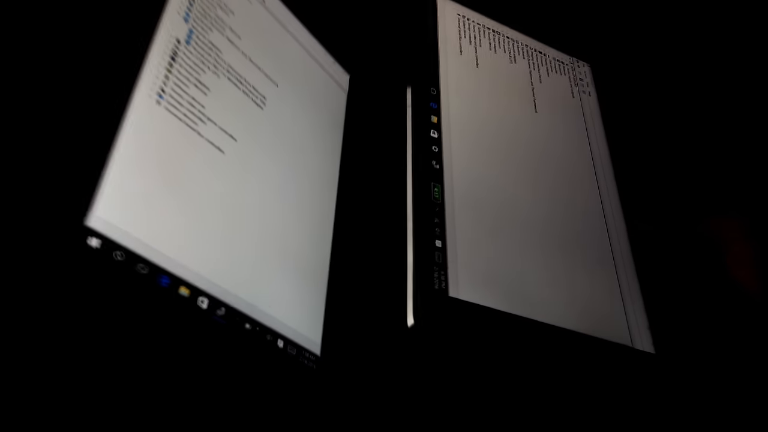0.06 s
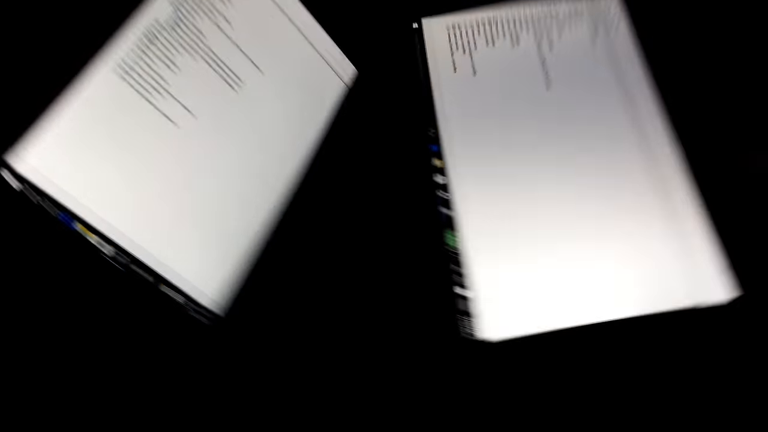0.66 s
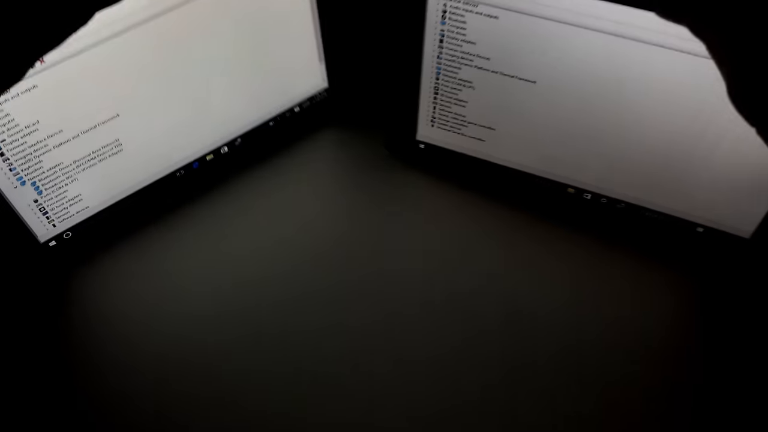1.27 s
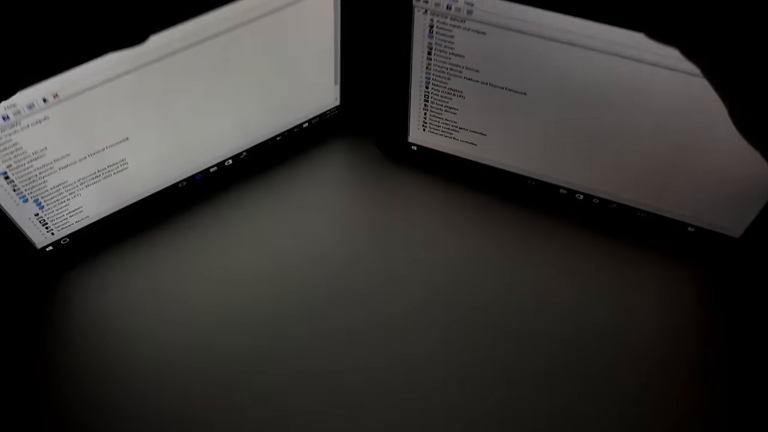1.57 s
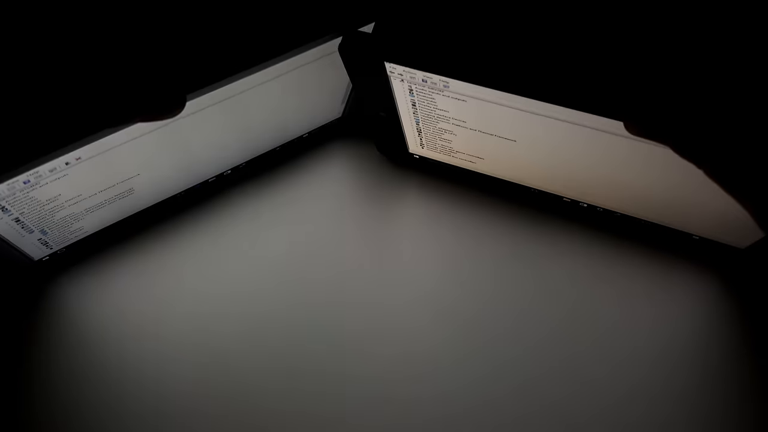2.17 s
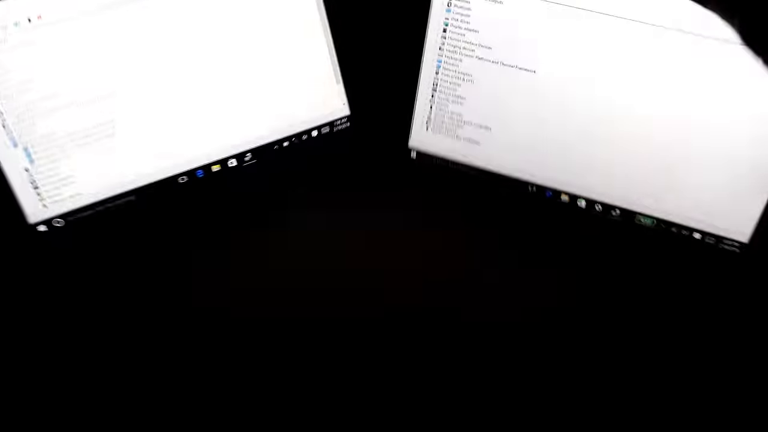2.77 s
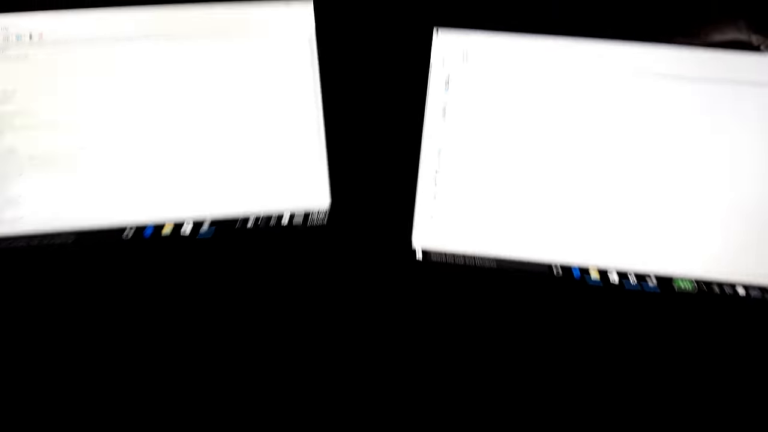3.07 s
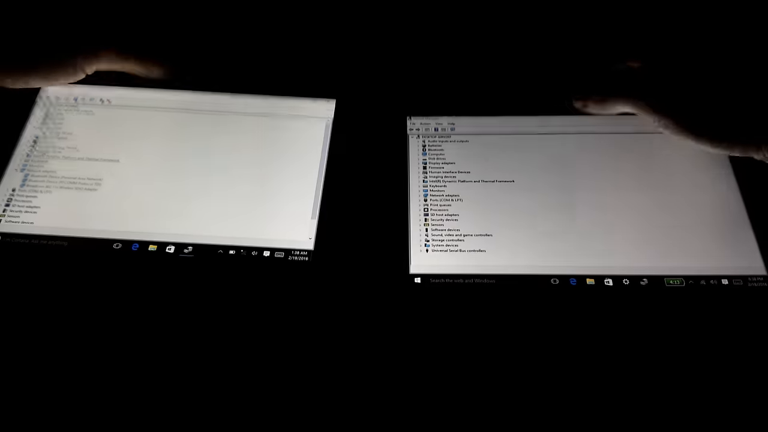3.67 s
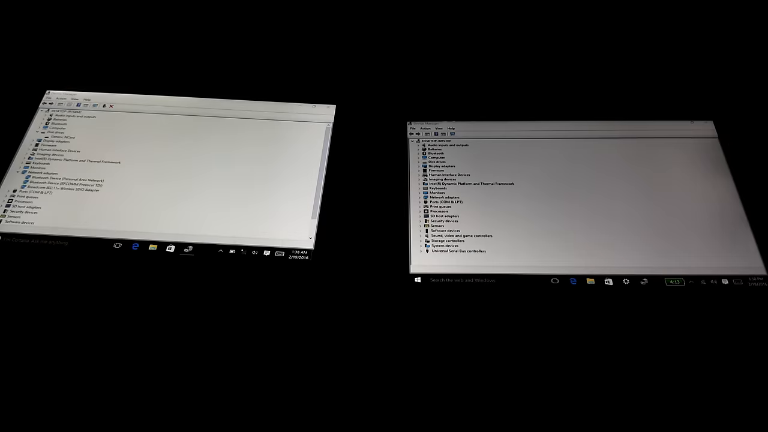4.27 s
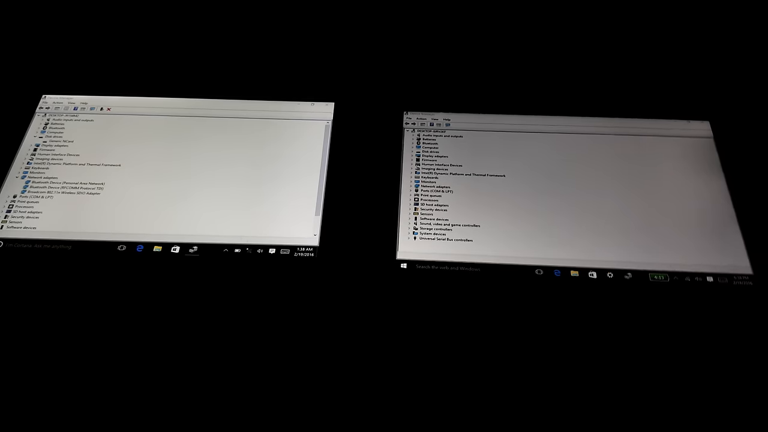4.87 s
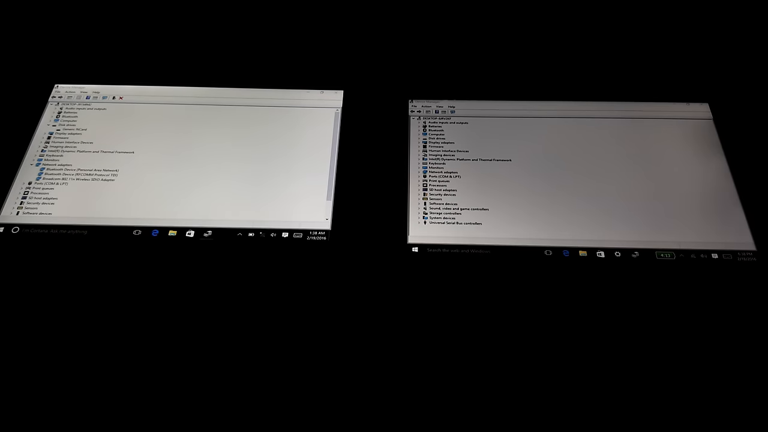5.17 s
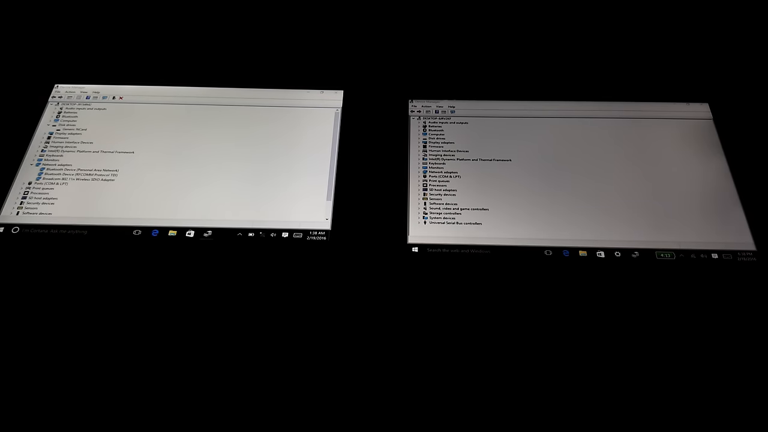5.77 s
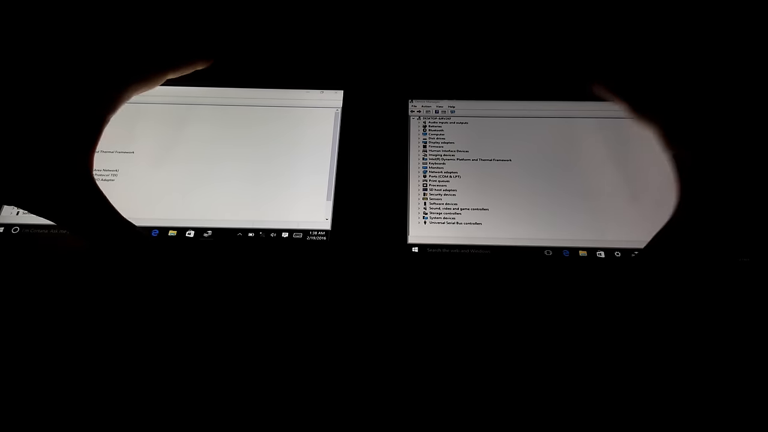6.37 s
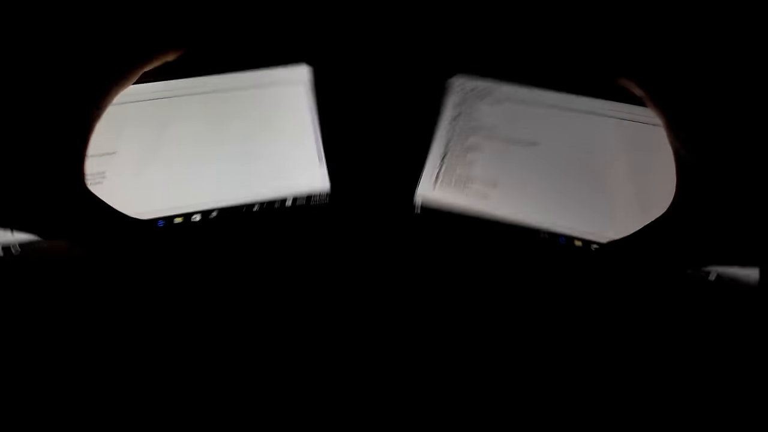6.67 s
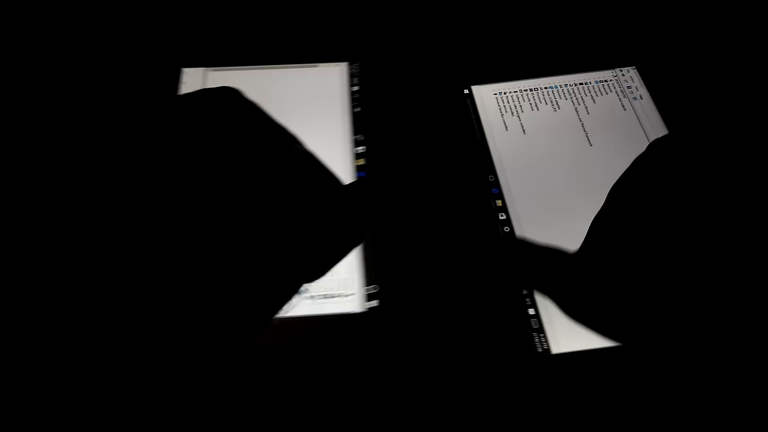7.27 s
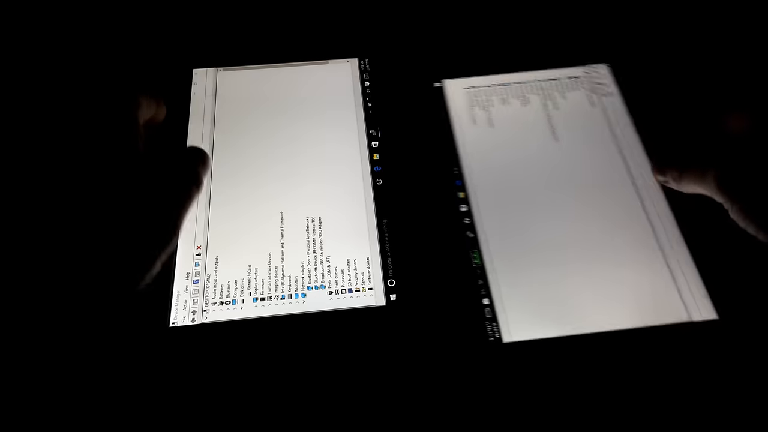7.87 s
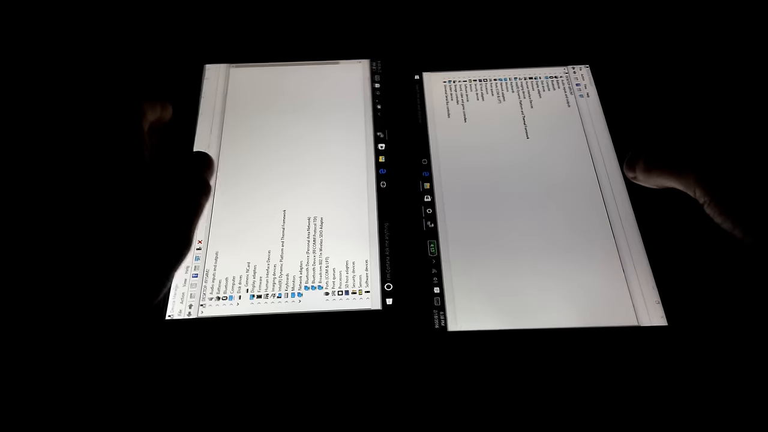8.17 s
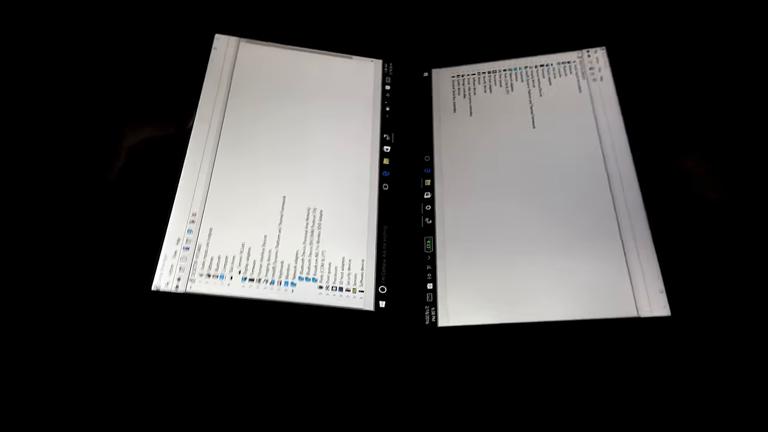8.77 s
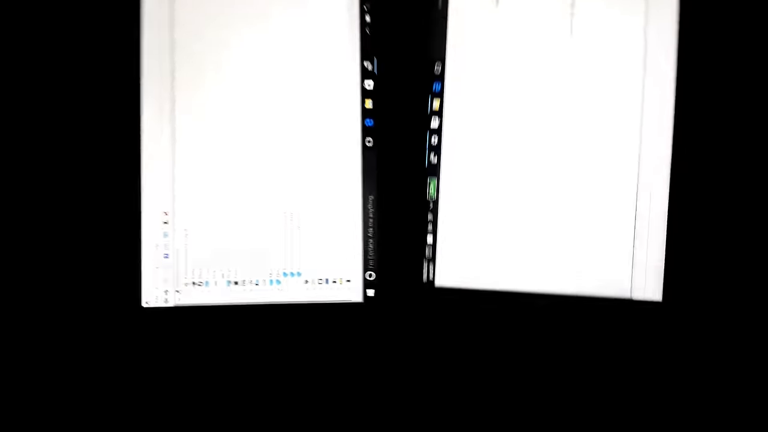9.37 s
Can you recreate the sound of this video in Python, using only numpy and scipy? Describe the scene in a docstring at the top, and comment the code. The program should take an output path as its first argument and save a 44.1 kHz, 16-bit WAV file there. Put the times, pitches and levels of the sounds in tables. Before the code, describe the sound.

Plastic devices knock, thump and slide on a table close to the microphone, with hands rubbing and a faint fan in a quiet room.

```python
"""Two small computers and a camera are shifted about on a table in a quiet room with a faint fan.
About a second in comes a cluster of knocks: each is a click of a plastic case, then a dull thump
that reaches the microphone through the table. From 2.5 s a case slides and bumps along, with the
hardest knock at 3.7 s. Then hands rub and jog the camera, with a few faint squeaks.
From 7.6 s lighter knocks follow, and a last soft slide."""
import sys
import numpy as np
from scipy import signal
from scipy.fft import rfft, irfft
from scipy.io import wavfile
from scipy.ndimage import uniform_filter1d

SR = 44100
rng = np.random.default_rng(int(sys.argv[2]) if len(sys.argv) > 2 else 0)


def materialize(psi):
    """Save the field psi as 16-bit PCM at rate SR to the path in sys.argv[1].

    A 1-D psi becomes a single channel; in a 2-D psi each row is a channel.
    """
    bounded = np.clip(np.atleast_2d(psi).T, -1, 1)
    quanta = np.round(bounded * 32767).astype(np.int16)
    wavfile.write(sys.argv[1], SR, quanta)


N = 419832
TIME = np.arange(N) / SR
FIRST_SECOND = TIME[:SR]

# Levels compare the rows of one table; the functions set how loud each layer ends up.
# How long the room's echo takes to fade by 60 dB: pitch_hz, fade_s
ECHO_FADES = [(60, 0.6), (200, 0.27), (600, 0.575), (2000, 0.53), (7000, 0.55), (14000, 0.15)]
# The tones of the fan: pitch_hz, level_db
FAN_TONES = [(199, -80), (937, -89), (1033, -85), (1131, -81), (1330, -89)]
# Tone colour, from bass to treble, of each kind of noise: pitch_hz, level_db
ROOM_COLOUR = [(12, -32), (20, 6), (107, 2), (123, -3), (268, -11.5), (300, -12.5), (326, -10), (496, -19),
               (554, -16.5), (1110, -22), (1210, -22.5), (1350, -22), (2720, -28.5), (4500, -30.5),
               (15800, -38.5)]
RUMBLE_COLOUR = [(20, 6), (45, 2.5), (70, -8), (105, -4), (170, -13), (230, -8.5), (300, -24), (420, -25.5),
                 (600, -34), (1200, -71)]
SKIN_COLOUR = [(240, -15.5), (400, -6.5), (439, 6), (504, -30.5), (696, -7.5), (976, -6), (1100, -2.5),
               (2210, -10), (4690, -7.5), (5140, -8), (6990, -2.5), (14900, -11), (15800, -7.5)]
DRAG_COLOUR = [(180, -42.5), (300, 6.5), (360, -0.5), (468, 1), (526, -4.5), (863, -11.5), (1180, -8),
               (1700, -14.5), (4490, -24.5), (7140, -28), (15500, -43)]
# Hands pushing, skin rubbing and a case sliding: start_s, length_s, level_db
HAND_PUSHES = [(1.14, 0.27, -39.5), (1.75, 0.14, -53), (2.55, 0.24, -46.5), (3.25, 0.23, -37),
               (3.66, 0.07, -32), (4.0, 0.5, -59), (4.95, 0.24, -63), (6.38, 1.16, -55), (7.58, 0.39, -54),
               (8.12, 0.081, -51.5), (8.47, 0.09, -48.5), (8.72, 0.39, -54.5), (9.2, 0.38, -56.5)]
SKIN_RUBS = [(.55, 0.2, -74.5), (2.55, 0.2, -72), (3.9, 0.43, -76.5), (4.43, 0.18, -69.5),
             (4.97, 0.097, -63.5), (5.94, 0.038, -71.5), (6.13, 0.15, -72), (6.41, 0.075, -65.5),
             (6.58, 0.25, -58), (6.75, 0.058, -59), (6.8, 0.64, -60.5), (7.81, 0.11, -66), (8.0, .22, -65),
             (8.6, 0.42, -77), (9.09, 0.19, -72), (9.42, 0.092, -72)]
CASE_SLIDES = [(.862, 0.013, -43.5), (2.55, 0.11, -64.5), (2.76, .4, -53.5), (3.23, 0.12, -50),
               (3.37, 0.078, -50.5), (3.57, 0.28, -54.5), (3.88, 0.21, -63), (8.48, 0.78, -68),
               (9.21, 0.18, -62.5), (9.43, 0.073, -59)]
# Squeaks of hinge and skin: start_s, length_s, pitch_hz, level_db
BRIEF_SQUEAKS = [(4.05, 0.061, 465, -54), (6.926, 0.18, 4660, -69), (7.293, 0.18, 436, -68)]
# Fingers clicking on plastic: start_s, level_db, pitch_hz
FINGER_CLICKS = [(.177, -67, 4320), (.539, -68, 6130), (.790, -55, 1005), (1.391, -57.5, 6440),
                 (1.652, -65.5, 2644), (1.765, -64.5, 2970), (2.29, -56, 620), (2.418, -48.5, 1775),
                 (2.420, -50.5, 3600), (3.337, -54, 7600), (3.632, -63.5, 4040), (7.630, -61.5, 1190),
                 (8.728, -60, 1200), (8.886, -60.5, 1300), (9.456, -58, 4400)]
# The notes at which each part rings when knocked: pitch_hz, level_db, fade_s (to fall 60 dB)
TABLE_SWAY_NOTES = [(47.44, 2, .27)]
TABLE_TOP_NOTES = [(103.4, -3.5, 0.17), (119, 2, .13), (141.8, -11.5, 0.079), (161.4, -14, 0.42)]
CAMERA_NOTES = [(181.1, -14, 0.12), (207.3, 1.5, 0.098), (238, -11, 0.16), (310, -19.5, 0.083),
                (360, -16.5, 0.073), (436, -20, 0.087), (490, -26, 0.098), (580, -28.5, .09),
                (658, -28, 0.089), (787, -34, .09)]
CASE_NOTES = [(377, -3, .18), (425, -8, .1), (538, 1, .16), (615, -9, .12), (731, -13, .18),
              (868, -16, .14), (1047, -10, .12), (1365, -7, .07), (1468, -9, .07), (1625, -9, .08),
              (2075, -20, .15)]
# The pitch bands a plastic case brings out in a clack or a tick: pitch_hz, width_hz, level_db
CLACK_BANDS = [(440, 160, -3), (660, 290, 19), (1012, 470, 14), (1410, 130, 4), (2330, 900, -17)]
TICK_BANDS = [(3125, 2100, -3.5), (4400, 1200, -2.5), (6640, 2500, 1), (11600, 2000, -6.5)]
# The knocks: start_s, table_db, camera_db, clack_db, tick_db, softness (1 is firm, more is softer)
CASE_KNOCKS = [(.863, -19, -23.5, -34, -44.5, 1.3), (.969, -6.5, 0, -35.5, -48, 1.22),
               (1.187, -12.5, -6, -39.5, -52.5, 1.3), (1.238, -22, -21.5, -55, -75, 1.3),
               (1.287, -21.5, -19.5, -53.5, -62, 0.89), (1.371, -14, -9, -39.5, -55.5, 1.02),
               (1.501, -31, -38.5, -60, -58, 0.78), (1.828, -32, -41.5, -69, -90, 1.37),
               (1.892, -49, -36.5, -70, -78, 2), (2.036, -24.5, -25.5, -51, -76, 1.01),
               (2.496, -34, -37.5, -61, -69.5, 1.16), (2.596, -19, -26.5, -61, -76, 2.02),
               (2.621, -20.5, -19.5, -61, -76, 1.17), (2.719, -13.5, -18.5, -49, -66, .9),
               (3.235, -15.5, -25.5, -37.5, -52.5, 1.47), (3.318, -10.5, -22.5, -37.5, -54, 1.44),
               (3.385, -20, -29, -42.5, -56, 1.01), (3.562, -22, -29, -47.5, -60, 1.88),
               (3.712, 4, 0.5, -24.5, -32.5, 1), (4.171, -30, -50.5, -63, -78, 0.88),
               (4.648, -29.5, -23.5, -49, -63, 1), (4.955, -37, -24.5, -69, -78.5, 2.5),
               (5.954, -41.5, -39, -61.5, -72, 2), (6.414, -39, -40, -75, -70, 1.9),
               (6.858, -44.5, -40, -69, -75, 1.9), (7.642, -38.5, -40, -65.5, -72, 1.66),
               (7.674, -41, -36.5, -69, -68, 0.8), (7.777, -33, -35, -61, -73, 2),
               (8.148, -42, -34, -56.5, -50.5, 0.75), (8.196, -37, -33.5, -59.5, -49, 0.86),
               (8.537, -30, -42, -59.5, -66, 2.3), (8.971, -34.5, -32.5, -66, -81, 1.63),
               (9.023, -29.5, -34, -62, -86, 0.8), (9.107, -31, -41, -52.5, -58, .8),
               (9.31, -23, -33, -47.5, -83, 1.03), (9.476, -29.5, -43, -59, -82, 1.86)]


def gain(db):
    """Turn decibels into a number to multiply by."""
    return 10 ** (np.asarray(db) / 20)


def normalise(x):
    """Scale a signal to an average strength (rms) of 1."""
    return x / np.sqrt(np.mean(x ** 2))


def fade_out(t, fade_s):
    """A fade that falls by 60 dB every fade_s seconds."""
    return np.exp(-np.log(1000) * t / fade_s)


def read_curve(hz, points):
    """Read between (pitch_hz, value) points, giving each octave equal room."""
    pitches, values = np.transpose(points)
    return np.interp(np.log(np.maximum(hz, 1)), np.log(pitches), values)


def colour(x, points):
    """Give a signal a tone colour, at strength 1."""
    hz = np.fft.rfftfreq(len(x), 1 / SR)
    return normalise(irfft(rfft(x) * gain(read_curve(hz, points)), len(x)))


def resonate(x, bands):
    """Bring out (pitch_hz, width_hz, level_db) bands of a signal and add them up."""
    return sum(gain(db) * signal.lfilter(*signal.iirpeak(hz, hz / width_hz, fs=SR), x)
               for hz, width_hz, db in bands)


def wander(rate_hz):
    """A curve of strength 1 that glides to a new random value rate_hz times a second."""
    step = int(SR / rate_hz)
    stairs = np.repeat(rng.standard_normal(N // step + 1), step)
    return normalise(uniform_filter1d(stairs, step)[:N])


def add(track, start_s, sound):
    """Mix a sound into a track at start_s."""
    i = max(int(start_s * SR), 0)
    track[i:i + len(sound)] += sound[:N - i]


def room_and_fan():
    """Even room noise and the tones of a small fan whose speed wavers slightly."""
    speed = 1 + .003 * wander(30)
    fan = sum(gain(db) * normalise(np.sin(2 * np.pi * hz * np.cumsum(speed) / SR))
              for hz, db in FAN_TONES)
    return gain(-60.5) * colour(rng.standard_normal(N), ROOM_COLOUR) + gain(-2) * fan


def room_echo(x, build_s):
    """A wash of echoes builds up, then each octave fades at its own pace, the highest first."""
    hz = np.fft.rfftfreq(SR, 1 / SR)
    spectrum = rfft(rng.standard_normal(SR))
    octaves = np.log2(np.clip(hz, 32, 16384))
    build = 1 - np.exp(-FIRST_SECOND / build_s)
    tail = 0
    for octave in range(5, 15):
        band = irfft(spectrum * np.maximum(1 - abs(octaves - octave), 0), SR)
        shape = build * fade_out(FIRST_SECOND, read_curve(2 ** octave, ECHO_FADES))
        tail = tail + band * shape / np.linalg.norm(shape)
    return signal.fftconvolve(x, tail)[:N]


def strokes(moves, rise_s, sag_db_per_s, release_db_per_s):
    """Loudness of hand movements: each swells, tires slowly while it lasts, then dies away."""
    power = np.zeros(N)
    for start_s, length_s, db in moves:
        t = TIME[:int((length_s + 1) * SR)]
        swell_s = min(rise_s, .65 * length_s)  # short strokes swell sooner
        swell = np.sin(np.pi / 2 * np.minimum(t / swell_s, 1))
        drop_db = sag_db_per_s * t + release_db_per_s * np.maximum(t - length_s, 0)
        add(power, start_s, (swell * gain(db - drop_db)) ** 2)
    return np.sqrt(power)


def friction(grain_db, flutter_db, flutter_hz):
    """Many tiny slips of uneven size under a wavering pressure."""
    return rng.standard_normal(N) * gain(grain_db * wander(900) + flutter_db * wander(flutter_hz))


def hand_rumble():
    """Hands push unsteadily on the table and camera, making a low rumble."""
    loudness = strokes(HAND_PUSHES, rise_s=.093, sag_db_per_s=1, release_db_per_s=73.5)
    push = friction(grain_db=2, flutter_db=1.8, flutter_hz=22)
    return gain(9) * colour(push, RUMBLE_COLOUR) * loudness


def skin_rubs():
    """Skin brushes over the casing with a soft hiss."""
    loudness = strokes(SKIN_RUBS, rise_s=.19, sag_db_per_s=6.5, release_db_per_s=96)
    brush = friction(grain_db=1, flutter_db=1.36, flutter_hz=23)
    return gain(1.13) * colour(brush, SKIN_COLOUR) * loudness


def case_slides():
    """A case dragged over the table scuffs and judders."""
    loudness = strokes(CASE_SLIDES, rise_s=.043, sag_db_per_s=5.5, release_db_per_s=168.5)
    drag = friction(grain_db=2, flutter_db=1.64, flutter_hz=41)
    scuff = colour(drag, DRAG_COLOUR)
    judder = resonate(drag, [(114, 40, 3.5), (238, 37, -6)])
    judder = normalise(resonate(judder, [(118, 60, 1), (238, 60, -3.5)]))
    return (gain(2.5) * scuff + gain(11) * judder) * loudness


def squeaks():
    """A hinge or skin sticks and slips for a moment, sounding one narrow band of pitch."""
    out = np.zeros(N)
    for start_s, length_s, hz, db in BRIEF_SQUEAKS:
        band = [(hz, .07 * hz, 0)]
        tone = normalise(resonate(resonate(rng.standard_normal(SR), band), band))
        swell = np.sin(np.pi * np.minimum(FIRST_SECOND / length_s, 1))
        add(out, start_s, gain(db) * tone * swell)
    return out


def snap(bands, low_hz, high_hz, rise_s, contact_s, tail_db, tail_s):
    """A burst of contact noise and its room tail, coloured by the case; strength 1 at its loudest."""
    t = FIRST_SECOND[:SR // 3]
    rise = 1 - np.exp(-t / rise_s)
    fall = np.exp(-t / contact_s) + gain(tail_db) * fade_out(t, tail_s)
    noise = np.sign(rng.standard_normal(len(t)))
    burst = resonate(noise * fall * rise, bands)
    burst = signal.lfilter(*signal.butter(2, [low_hz, high_hz], "band", fs=SR), burst)
    power = uniform_filter1d(burst ** 2, 132)  # averaged over 3 ms
    return burst / np.sqrt(power.max())


def finger_clicks():
    """Fingers click lightly on plastic near the microphone, each around one pitch."""
    out = np.zeros(N)
    for start_s, db, hz in FINGER_CLICKS:
        click = snap([(hz, .22 * hz, 0)], hz / 2, 2 * hz,
                     rise_s=.0002, contact_s=.0013, tail_db=-31, tail_s=.25)
        add(out, start_s, gain(db) * click)
    return out


def ring(notes, rise_s, pitch_spread, length_s):
    """A knocked part swells, then rings; the hands' grip shifts its pitch a little each time."""
    hz, db, fade_s = np.transpose(notes)[:, :, None]
    t = FIRST_SECOND[:round(length_s * SR)]
    hz = hz * (1 + pitch_spread * rng.standard_normal())
    swing = np.cos(2 * np.pi * hz * (t - rise_s))  # all in step at the height of the push
    ringing = np.sum(gain(db) * swing * fade_out(t, fade_s), axis=0)
    swell = 1 - np.exp(-(t / rise_s) ** 3)
    smooth_end = 1 - (t / t[-1]) ** 4
    out = ringing * swell * smooth_end
    return out / abs(out).max()


def knocks():
    """The tick and clack travel by air; the thump comes through the table and booms in the room."""
    thumps, clatter = np.zeros((2, N))
    for start_s, table_db, camera_db, clack_db, tick_db, softness in CASE_KNOCKS:
        # a soft contact starts pushing earlier and pushes for longer
        push_s = start_s - .007 * (softness - 1) - .001
        sway = ring(TABLE_SWAY_NOTES, rise_s=.016 * softness, pitch_spread=.024, length_s=.4)
        table = ring(TABLE_TOP_NOTES, rise_s=.0121 * softness, pitch_spread=.025, length_s=.4)
        camera = ring(CAMERA_NOTES, rise_s=.011 * softness, pitch_spread=.022, length_s=.2)
        add(thumps, push_s, gain(clack_db + 11.5) * sway)  # a hard clack rocks the whole table
        add(thumps, push_s, gain(table_db - 2) * table)
        add(thumps, push_s, gain(camera_db - 1.5) * camera)

        # the hands muffle the case: only a hard blow makes it ring out
        case_db = clack_db + np.interp(clack_db, [-33, -23], [1, 13])
        case = ring(CASE_NOTES, rise_s=.0044 * softness, pitch_spread=.0054, length_s=.2)
        add(clatter, start_s, gain(case_db) * case)
        bluntness = softness ** 2.5
        clack = snap(CLACK_BANDS, 350, 2900, rise_s=.00035 * bluntness,
                     contact_s=.0017 * bluntness, tail_db=-11, tail_s=.29)
        add(clatter, start_s, gain(clack_db - 1.5) * clack)

        # a harder contact is shorter, so its tick reaches higher
        reach_hz = np.clip(8800 * gain(.36 * (tick_db + 52)), 5000, SR / 2 - 1000)
        bounce_s = .013 * rng.uniform(.95, 1.5)  # the edge of the case touches down a second time
        for delay_s, db in (0, tick_db), (bounce_s, tick_db - 7.5):
            tick = snap(TICK_BANDS, 1800, reach_hz, rise_s=.00022 * bluntness,
                        contact_s=.0017 * bluntness, tail_db=-16, tail_s=.26)
            add(clatter, start_s + delay_s, gain(db) * tick)
    boom = gain(-20) * room_echo(thumps, build_s=.018)
    clatter_echo = gain(-15) * room_echo(clatter, build_s=.012)
    return thumps + clatter + boom + clatter_echo


def scene():
    """Everything that reaches the camera's one microphone."""
    handling = knocks() + finger_clicks() + squeaks() + case_slides() + skin_rubs() + hand_rumble()
    return (handling + room_and_fan())[None]


def record(dry):
    """The hardest thump overloads the input, and the treble above 15850 Hz is cut."""
    treble_cut = signal.ellip(10, .1, 80, 15850, fs=SR, output="sos")
    return signal.sosfilt(treble_cut, np.clip(dry, -1, 1))


dry = scene()
out = record(dry)
materialize(out)
```